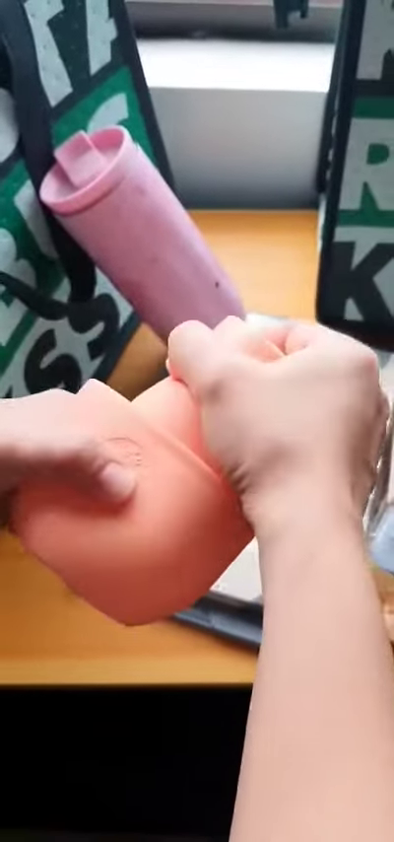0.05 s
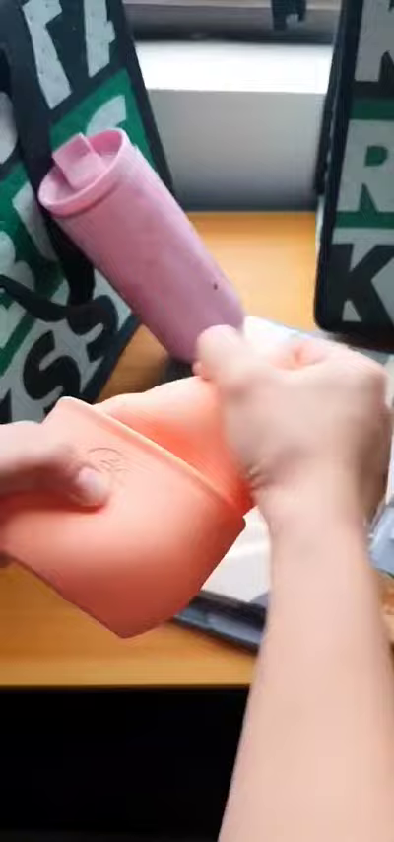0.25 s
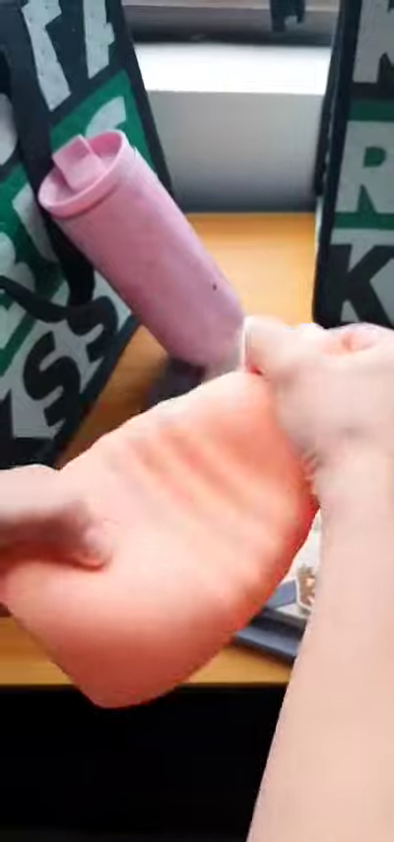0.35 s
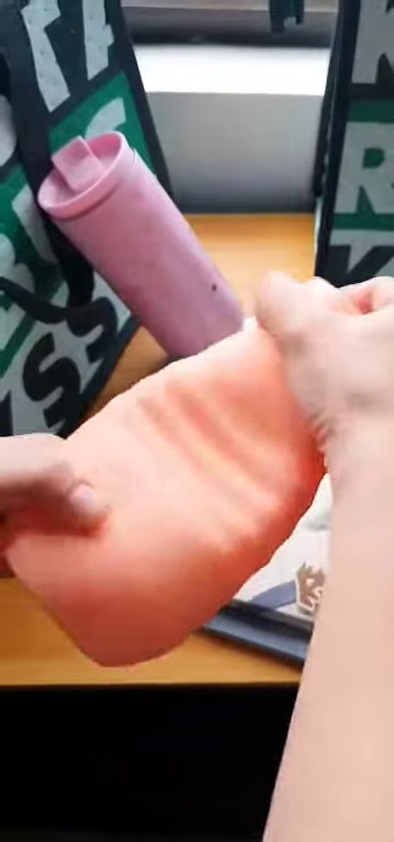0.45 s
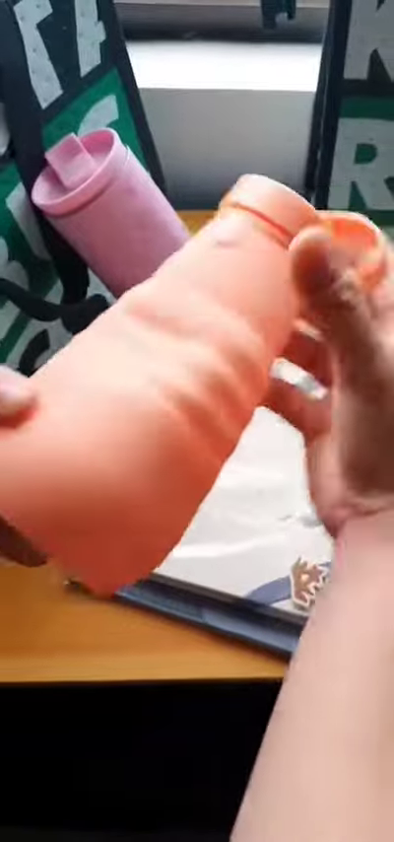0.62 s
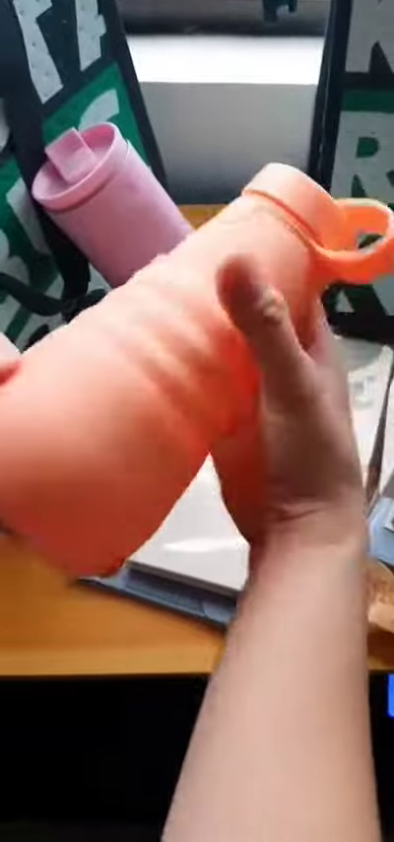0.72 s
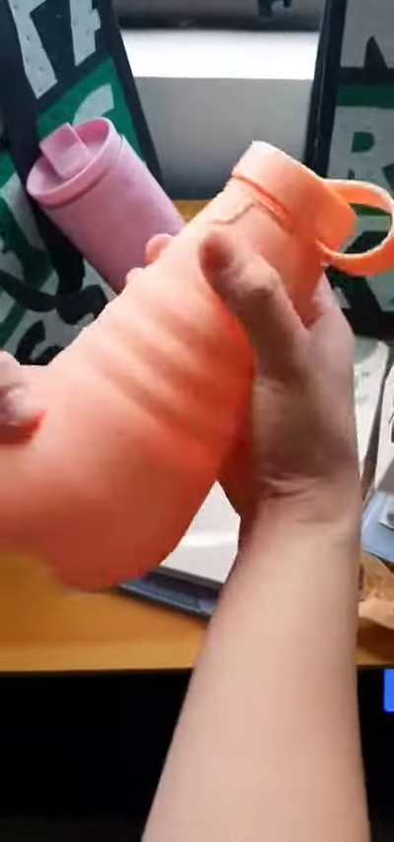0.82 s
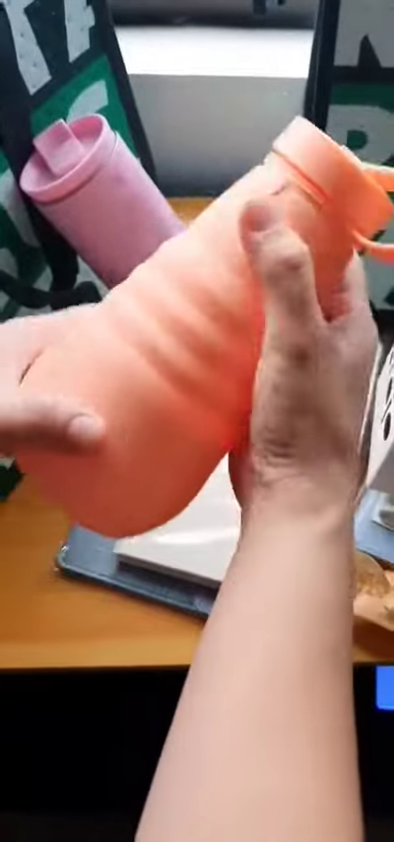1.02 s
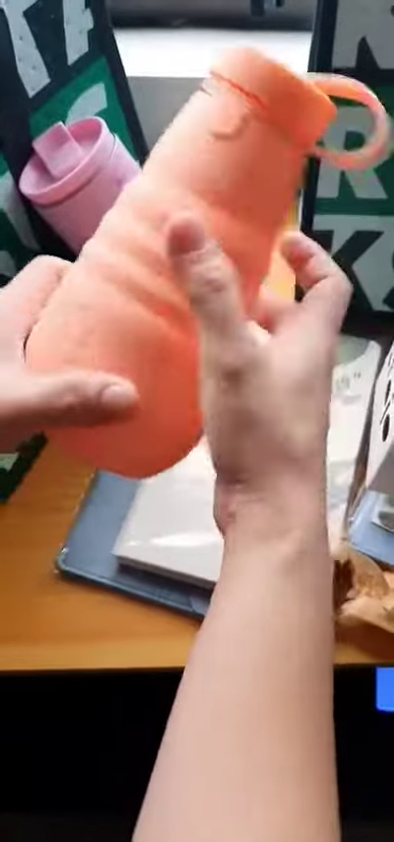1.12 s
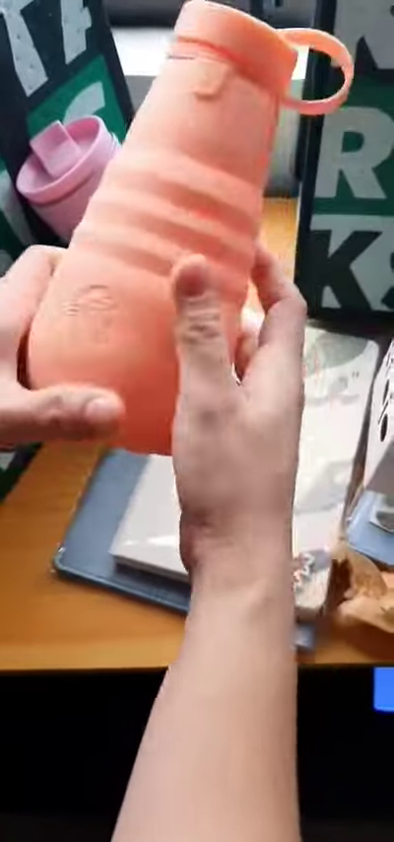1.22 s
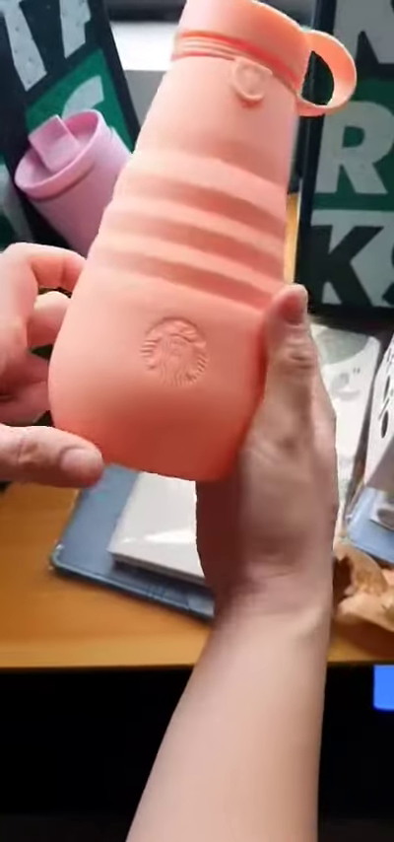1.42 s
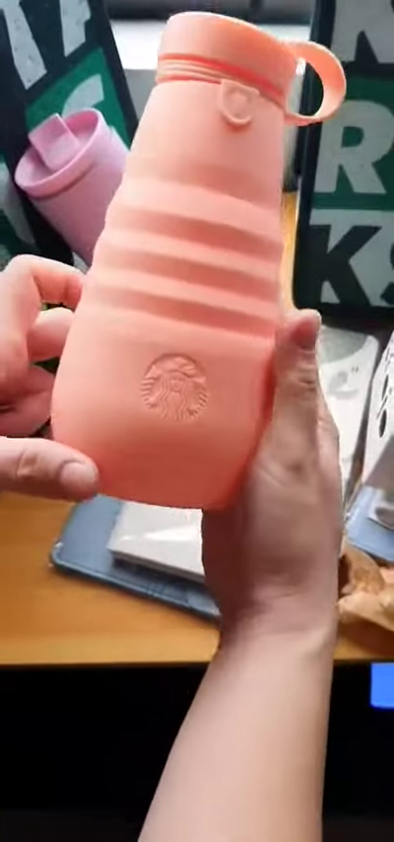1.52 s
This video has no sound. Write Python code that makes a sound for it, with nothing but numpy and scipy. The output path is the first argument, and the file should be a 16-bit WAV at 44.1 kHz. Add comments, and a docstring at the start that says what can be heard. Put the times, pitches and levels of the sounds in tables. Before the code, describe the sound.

A folded silicone bottle snaps open at about 0.25 seconds with a loud, rapid cluster of pops and hollow thumps, whose low ring quickly dies away. Soft finger bumps and a dull rubbery rumble precede it. Rubber slides against skin until 0.7 seconds, squeaking faintly at 0.5. Light bumps follow near 0.8 and 1.5 seconds. A low fan hum with a thin whine fills the small, quiet room.

```python
"""In a small, quiet room, a folded silicone bottle is pulled open over a desk.
Its pleats buckle in quick succession: each snap gives a click, a thump of the enclosed air and a
short ring of the wall. A hollow-sounding cluster of low tones dies away after the last snap.
The rubber rumbles under tension, then slides in the hands with a friction hiss and a faint squeak.
Fingers bump it before and after, over a low fan hum with a thin whine."""
import sys
import numpy as np
from scipy import signal
from scipy.fft import rfft, irfft
from scipy.io import wavfile
from scipy.ndimage import uniform_filter1d, minimum_filter1d

SR = 44100
rng = np.random.default_rng(int(sys.argv[2]) if len(sys.argv) > 2 else 0)


def int16_out(signal):
    """Quantize to a 16-bit WAV file."""
    q = np.round(np.clip(np.atleast_2d(signal).T, -1, 1) * 32767)
    wavfile.write(sys.argv[1], SR, q.astype(np.int16))


N = 68355
TIME_S, BIN_HZ = np.arange(N) / SR, np.fft.rfftfreq(N * 2, 1 / SR)


def undb(db):
    """Amplitude ratio of a level in decibels."""
    return 10 ** (np.asarray(db) / 20)


def since(start):
    """Seconds elapsed since the start, zero before it."""
    return np.maximum(TIME_S - start, 0)


def over_hz(points):
    """Interpolation of (Hz, value) points over log frequency, at each bin."""
    hz, values = np.array(points, float).T
    return np.interp(np.log(BIN_HZ + 1), np.log(hz), values)


def shape(x, gain):
    """Linear filtering: the spectrum of x is multiplied by a gain."""
    return irfft(rfft(x, N * 2) * gain)[..., :N]


def minimum_phase(gain):
    """Minimum phase gives the tightest causal pulse with this spectrum."""
    cepstrum = irfft(np.log(gain + 1e-9))
    cepstrum[1:N] *= 2
    cepstrum[N + 1:] = 0
    return irfft(np.exp(rfft(cepstrum)))[:N]


def convolve(x, response):
    """Convolution passes x through an impulse response."""
    return signal.fftconvolve(np.atleast_2d(x), np.atleast_2d(response), axes=1)[:, :N]


def ring(tones, start):
    """Damped sinusoids start together and decay exponentially, by 60 dB in their T60."""
    t = since(start)
    return sum(undb(db) * np.sin(2 * np.pi * hz * t) * np.exp(-np.log(1000) * t / t60)
               for hz, db, t60 in tones)


def lean(x, balance):
    """A level difference between the channels shifts each band left or right."""
    return shape(x, undb(np.array([[1], [-1]]) * over_hz(balance) / 2))


# Coherence of the sound field. Each row: frequency in Hz, correlation of left with right.
COHERENCE = [(100, 0.95), (300, 0.96), (700, 0.01), (1500, 0), (4000, 0.12), (12000, 0)]
def diffuse():
    """A diffuse field: white noise, alike at both ears in the bass and nearly unrelated in the treble."""
    correlation = over_hz(COHERENCE)
    weights = np.sqrt(np.array([1 + correlation, 1 - correlation]) / 2)
    mid, side = shape(rng.standard_normal((2, N)), weights)
    return np.array([mid + side, mid - side])


def noise(gain):
    """Filtering colours diffuse noise; the result has an rms of 1."""
    x = shape(diffuse(), gain)
    return x / x.std()


# Spectrum of the fan. Each row: frequency in Hz, relative spectral density in dB.
FAN_SPECTRUM = [(15, -38), (25, -46), (58, -1.5), (92, -9), (166, -5), (270, -8.5), (405, -8.5),
                (503, -15.5), (545, -15), (1130, -19), (1560, -20), (1700, -19), (2910, -24), (3160, -26.5),
                (8140, -41.5), (11600, -38), (16000, -46)]
# Tones of the whine. Each row: frequency in Hz, level in dB.
FAN_WHINES = [(1620, -60.5), (2955, -60)]
# Direction of the fan. Each row: frequency in Hz, left minus right in dB.
FAN_BALANCE = [(4000, 0), (9000, -8.5), (15000, -1.5)]
def fan(noise_db=-44.5, wander_hz=3.48):
    """Fan noise is a steady broadband spectrum plus tones, here wandering slightly in pitch."""
    out = undb(noise_db) * noise(undb(over_hz(FAN_SPECTRUM)))
    for hz, db in FAN_WHINES:
        wander = uniform_filter1d(rng.standard_normal((2, N)), size=900)
        pitch_hz = hz + wander_hz * wander / wander.std()
        out += undb(db) * np.sqrt(2) * np.sin(2 * np.pi * np.cumsum(pitch_hz, axis=1) / SR)
    return lean(out, FAN_BALANCE)


# Spectrum of the strained rubber. Each row: frequency in Hz, relative level in dB.
STRAIN_SPECTRUM = [(30, -34), (70, 13.5), (150, 1.5), (350, -3), (800, -13), (2800, -25), (6000, -43),
                   (16000, -55)]
def strain(db=-47.5, release_s=0.33, decay_s=0.14):
    """Rubber under tension gives a dull rumble that decays exponentially after release."""
    return noise(undb(over_hz(STRAIN_SPECTRUM))) * undb(db) * np.exp(-since(release_s) / decay_s)


# Envelope of the sliding. Each row: time in seconds, level in dB.
SLIDE_ENVELOPE = [(0, -58), (.2, -58), (0.329, -39.5), (.44, -47.5), (.5, -45), (.57, -49.5), (.66, -48.5),
                  (.72, -58), (.96, -60.5), (1.01, -54), (1.07, -61), (1.55, -59)]
# Spectrum of the sliding. Each row: frequency in Hz, relative level in dB.
SLIDE_SPECTRUM = [(200, 11), (1000, -4.5), (2500, 6), (4500, -0.5), (6500, 0.5), (7700, -12.5), (9000, -3),
                  (12000, -4), (16000, -15.5)]
def slide():
    """Sliding friction between rubber and skin makes a broadband hiss."""
    level_db = np.interp(TIME_S, *np.array(SLIDE_ENVELOPE).T)
    return noise(undb(over_hz(SLIDE_SPECTRUM))) * undb(level_db)


# Finger impacts. Each row: start in seconds, gain in dB.
FINGER_BUMPS = [(0.029, -41), (.095, -54), (0.153, -35.5), (0.759, -41), (0.785, -34), (.803, -34),
                (0.82, -35.5), (1.469, -32)]
# Modes of the bumped bottle. Each row: frequency in Hz, relative level in dB, T60 in seconds.
BODY_MODES = [(84.5, -16, 0.18), (148, -7.5, 0.15), (315, -7.5, 0.075), (1560, -32, 0.0033)]
def finger_bumps():
    """Impact excitation: each touch of a finger sets the same damped modes ringing."""
    return sum(undb(db) * ring(BODY_MODES, start) for start, db in FINGER_BUMPS)


def soft_ring(tones, start, rise_s=0.0017):
    """A brief exponential rise softens the onset of damped tones."""
    return ring(tones, start) * (1 - np.exp(-since(start) / rise_s))


# Pleats snapping over. Each row: start in seconds, click gain in dB, low-pass corner of click and
# wall in Hz, thump frequency in Hz, thump level in dB, thump T60 in seconds, wall gain in dB.
PLEATS = [(0.2355, -1.5, 750, 120, -6, 0.07, -9), (0.2363, -6.5, 6130, 400, -2, 0.012, -20.5),
          (0.2653, 4.5, 2500, 127.2, -0.5, 0.064, -5), (0.2697, -4, 6770, 202, -38, 0.017, -19.5),
          (0.2893, 4, 5280, 223, -6, 0.026, -12), (0.2955, 8.5, 3500, 300, -10, 0.091, -2)]
# Spectrum of a click. Each row: frequency in Hz, relative level in dB.
CLICK_SPECTRUM = [(60, -19), (250, 6.5), (600, 9), (1000, 2), (1600, -0.5), (2100, 5), (3500, 4.5),
                  (5500, -5.5), (7800, -8.5), (10000, 0), (16000, 1)]
# Modes of the rubber wall. Each row: frequency in Hz, relative level in dB, T60 in seconds.
WALL_MODES = [(400, -5.5, 0.021), (489, -4, 0.02), (683, -19, 0.011), (1215, -19, 0.015),
              (1508, -13.5, 0.014), (1700, -4.5, 0.0086), (2493, -10, 0.019), (2780, -15, 0.0074),
              (3500, -19.5, 0.0052)]
def pleat_snaps(click_boost_db=7, lowpass_order=4.84, bass_delay_s=0.00101, half_delay_hz=1960):
    """Snap-through buckling: each pleat clicks, rings the wall and thumps the air inside."""
    out = np.zeros(N)
    click = minimum_phase(undb(over_hz(CLICK_SPECTRUM) + click_boost_db))
    wall = ring(WALL_MODES, 0)
    for start, click_db, corner_hz, thump_hz, thump_db, t60, wall_db in PLEATS:
        lowpass = minimum_phase(1 / np.sqrt(1 + (BIN_HZ / corner_hz) ** (2 * lowpass_order)))
        snap = convolve(undb(click_db) * click + undb(wall_db) * wall, lowpass)[0]
        onset = int(start * SR)
        out[onset:] -= snap[:N - onset]
        out += soft_ring([(thump_hz, thump_db, t60)], start)
    # Bending waves are dispersive: the lower the frequency, the later it arrives.
    lag_cycles = bass_delay_s * half_delay_hz * np.log(1 + BIN_HZ / half_delay_hz)
    return shape(out, np.exp(-2j * np.pi * lag_cycles))


# Low tones after the last snap. Each row: frequency in Hz, level in dB, T60 in seconds.
LOW_TAIL_TONES = [(135.7, -22, 0.29), (164.4, -19.5, 0.17), (197, -11.5, 0.099), (278.7, -13.5, 0.13),
                  (315.8, -14.5, 0.16), (385.7, -30, .16), (452, -25.5, 0.096), (503, -38, 0.053)]
def low_tail():
    """Exponential decay: a hollow-sounding cluster of low tones dies away after the last snap."""
    return soft_ring(LOW_TAIL_TONES, start=PLEATS[-1][0])


def friction_band(peak_s, spread_s, hz, half_width_hz, db):
    """Friction noise in a band around one frequency swells and fades under a Gaussian envelope."""
    band = noise(1 / (1 + ((BIN_HZ - hz) / half_width_hz) ** 2))
    return band * undb(db) * np.exp(-((TIME_S - peak_s) / spread_s) ** 2)


# Echo of the walls. Each row: band frequency in Hz, relative level in dB, T60 in seconds.
REVERB_BANDS = [(99, -12, 0.17), (300, -4.5, 0.2), (710, -5, 0.3), (1430, -2, 0.24), (2740, -3.5, 0.23),
                (5130, -1.5, 0.097), (12000, 12, 0.1)]
def reverberation(gain_db=-1.5, rise_s=0.0036):
    """Wall reflections merge into a diffuse response that decays at its own rate in each band."""
    air, tail = diffuse(), 0
    for hz, db, t60 in REVERB_BANDS:
        band = over_hz([(row[0], row[0] == hz) for row in REVERB_BANDS])
        rate = np.log(1000) / t60
        envelope = np.exp(-rate * TIME_S) * np.sqrt(2 * rate / SR)
        tail += shape(air, band) * envelope * undb(db + gain_db)
    return tail * (1 - np.exp(-TIME_S / rise_s))


def room(x, pan_left_db=3.5, right_lag_s=0.00012, desk_lag_s=0.00287, desk_top_hz=910, scatter_s=0.0018):
    """Superposition of paths: direct sound, bass mirrored by the desk, treble off clutter, wall echo."""
    direct = np.array([x, np.interp(TIME_S - right_lag_s, TIME_S, x)])
    direct *= undb(np.array([[1], [-1]]) * pan_left_db / 2)
    delayed = np.interp(TIME_S - desk_lag_s, TIME_S, x)
    desk = undb(-19) * shape(delayed, 1 / (1 + (BIN_HZ / desk_top_hz) ** 2))
    clutter = shape(rng.standard_normal((2, N)), np.sqrt(1 - over_hz(COHERENCE)))
    clutter *= np.exp(-TIME_S / scatter_s) * undb(-1.5) / np.sqrt(SR * scatter_s / 2)
    return direct - desk + convolve(x, clutter + reverberation())


def scene(low_cut_hz=75):
    """A small source radiates little deep bass; the bottle in the room adds to the hands and the fan."""
    radiation = signal.butter(3, low_cut_hz, "high", fs=SR, output="sos")
    bottle = room(signal.sosfilt(radiation, pleat_snaps() + low_tail()))
    handling = strain() + slide() + finger_bumps()
    squeak = friction_band(peak_s=0.503, spread_s=0.024, hz=6500, half_width_hz=350, db=-53)
    # A finer hiss as the grip slips to the neck.
    slip = friction_band(peak_s=0.63, spread_s=0.092, hz=15000, half_width_hz=4100, db=-54.5)
    return bottle + handling + squeak + slip + fan()


def auto_gain(x, boost_db=3.5, threshold_db=-20, sink_db_per_s=0.3):
    """Automatic gain control: loud sound removes a boost for good; the gain also sinks slowly."""
    level_db = 10 * np.log10(uniform_filter1d((x ** 2).mean(axis=0), size=132) + 1e-12)
    excess_db = np.clip(level_db - threshold_db, 0, boost_db)
    sink_db = sink_db_per_s * TIME_S
    cut_db = np.maximum.accumulate(excess_db - sink_db) + sink_db
    return x * undb(boost_db - cut_db)


# Mismatch of the two microphone ports. Each row: frequency in Hz, left minus right in dB.
PORT_MISMATCH = [(110, 0.2), (400, -0.4), (800, 1.5), (1130, -3), (1550, -1.5), (2300, -5.5), (3400, -2.5),
                 (5500, 4.5), (8000, 1.5), (11000, -3.5), (15000, -2)]
def record(dry, ceiling=0.97, top_hz=15800):
    """The ports differ in frequency response; automatic gain, a peak limiter and a low-pass follow."""
    x = auto_gain(lean(dry, PORT_MISMATCH))
    limiter_gain = ceiling / np.maximum(abs(x).max(axis=0), ceiling)
    limiter_gain = uniform_filter1d(minimum_filter1d(limiter_gain, size=45), size=45)
    lowpass = signal.ellip(10, 0.2, 80, top_hz, fs=SR, output="sos")
    return signal.sosfilt(lowpass, x * limiter_gain)


dry = scene()
out = record(dry)
int16_out(out)
```